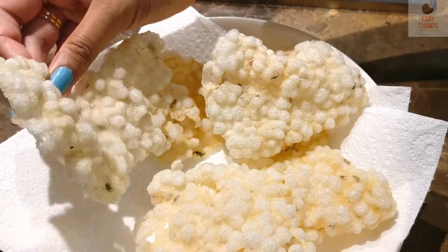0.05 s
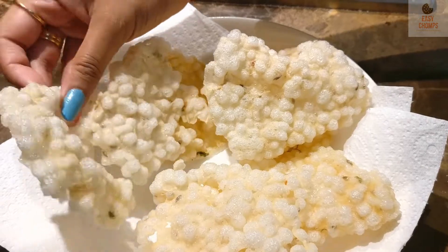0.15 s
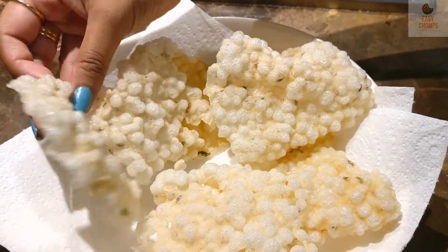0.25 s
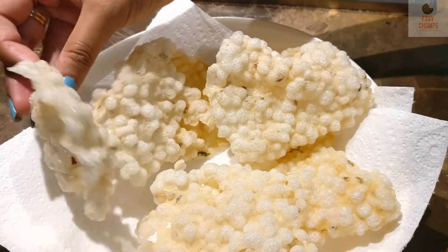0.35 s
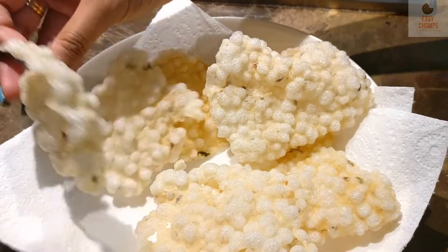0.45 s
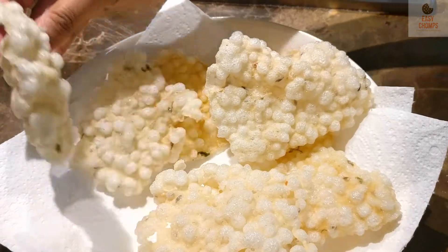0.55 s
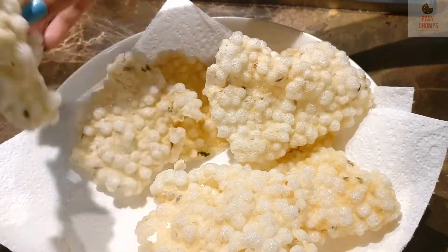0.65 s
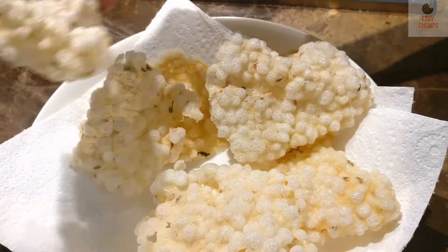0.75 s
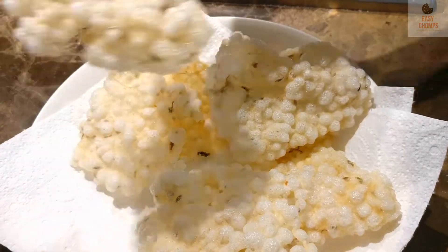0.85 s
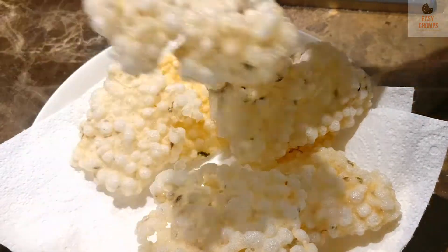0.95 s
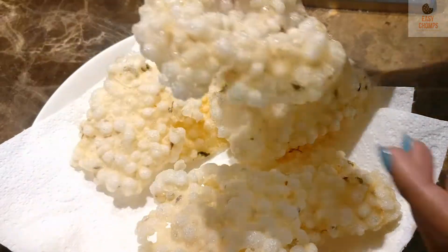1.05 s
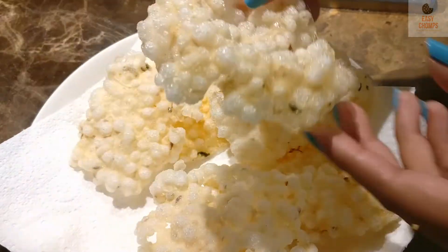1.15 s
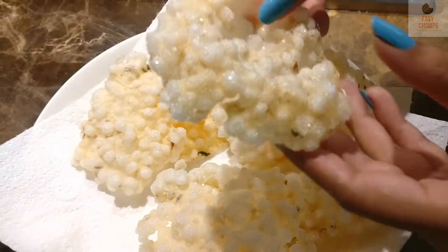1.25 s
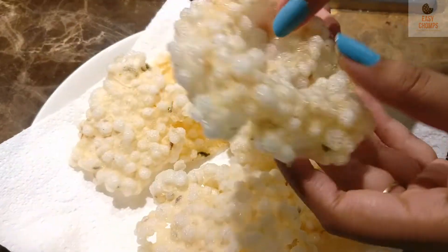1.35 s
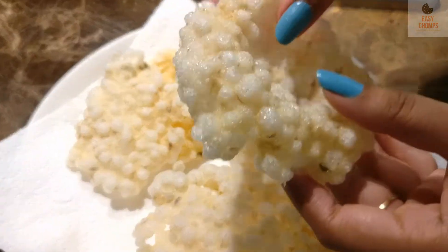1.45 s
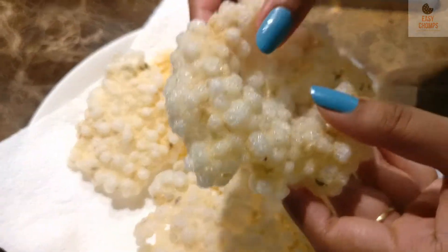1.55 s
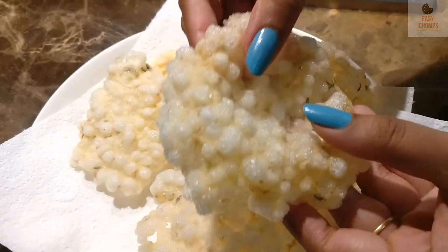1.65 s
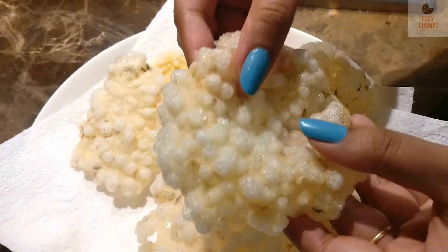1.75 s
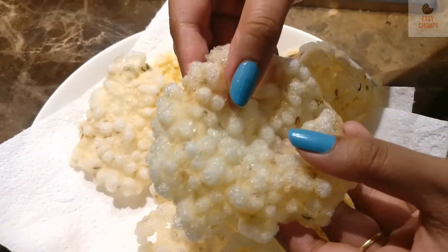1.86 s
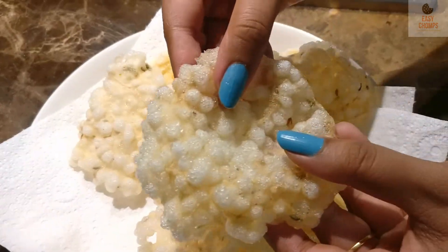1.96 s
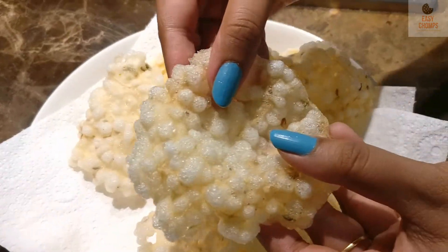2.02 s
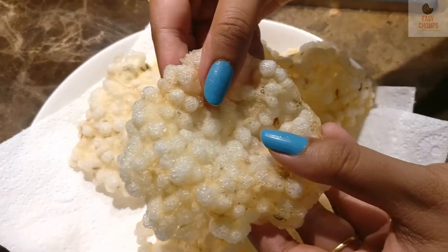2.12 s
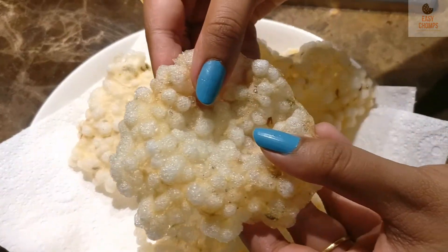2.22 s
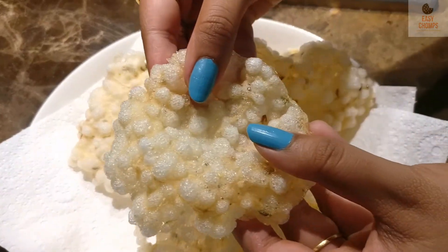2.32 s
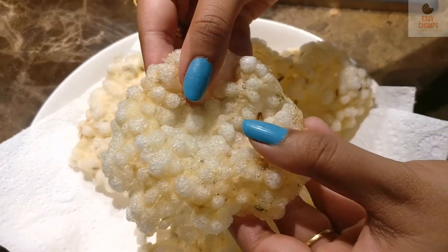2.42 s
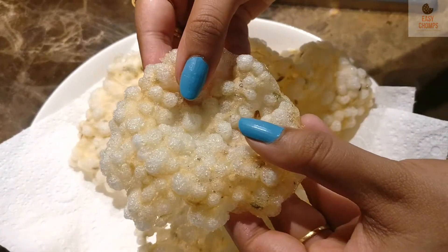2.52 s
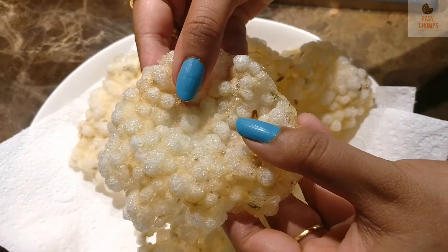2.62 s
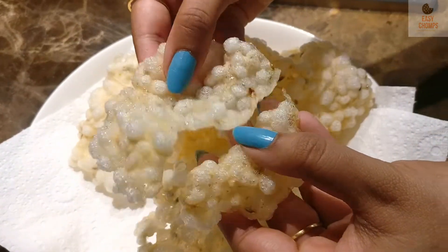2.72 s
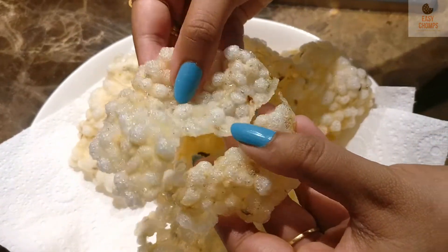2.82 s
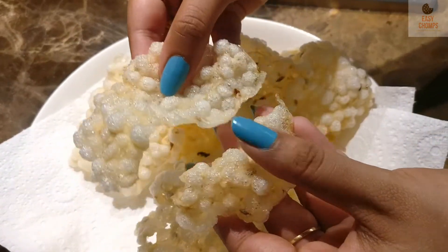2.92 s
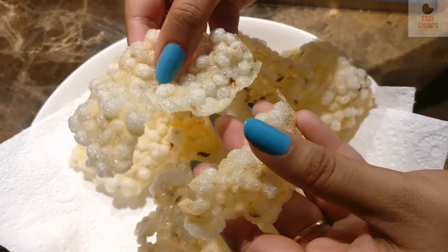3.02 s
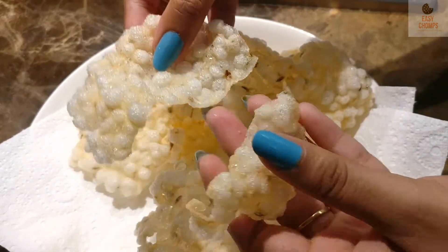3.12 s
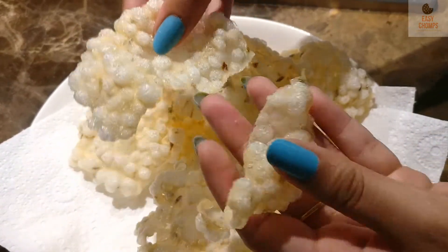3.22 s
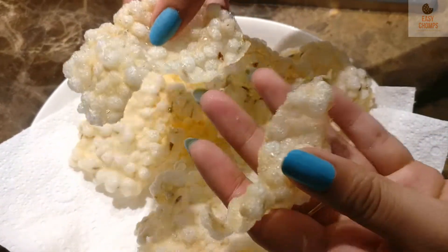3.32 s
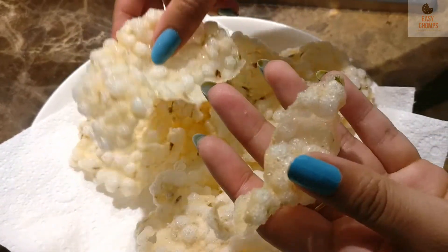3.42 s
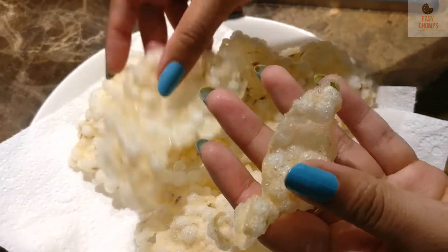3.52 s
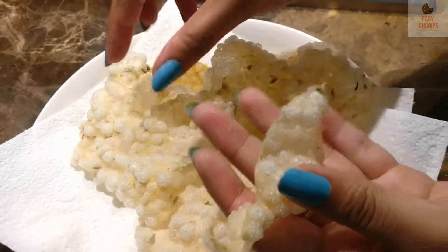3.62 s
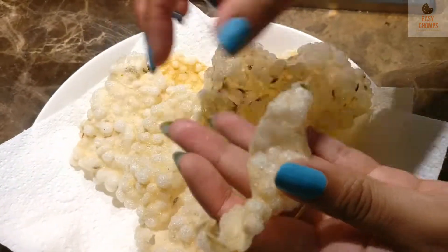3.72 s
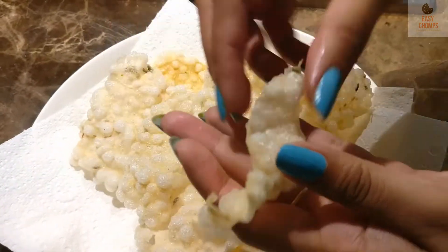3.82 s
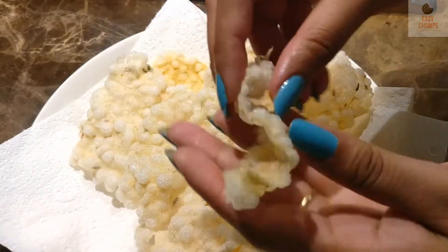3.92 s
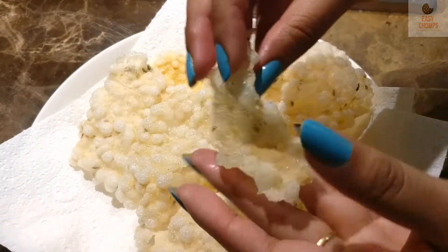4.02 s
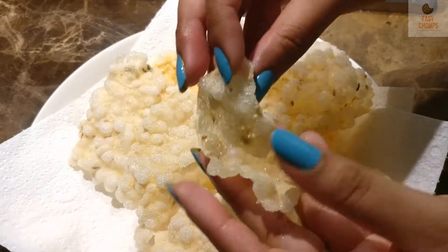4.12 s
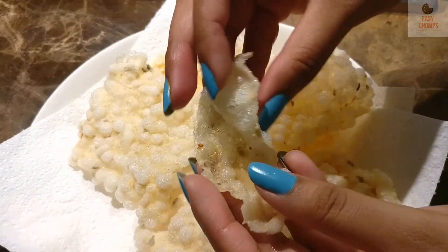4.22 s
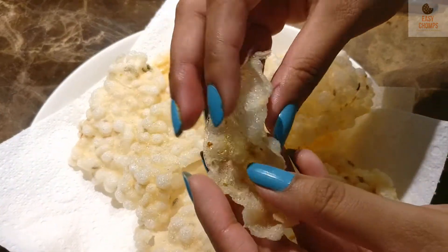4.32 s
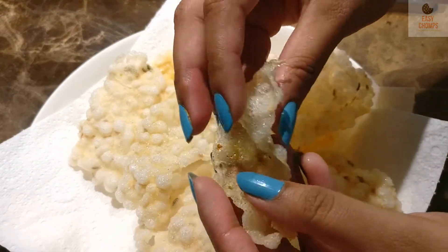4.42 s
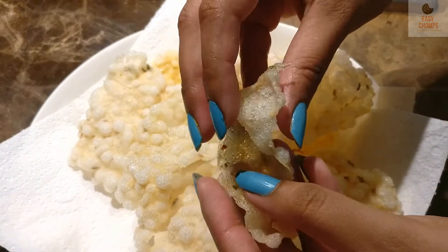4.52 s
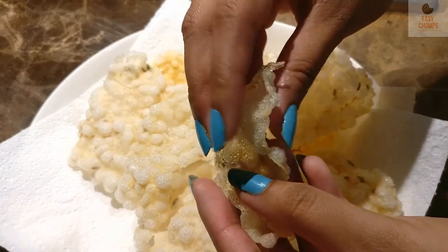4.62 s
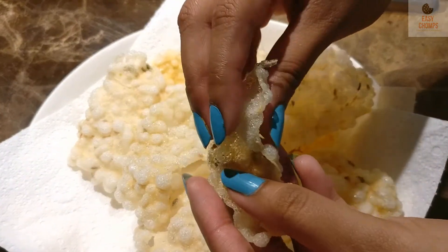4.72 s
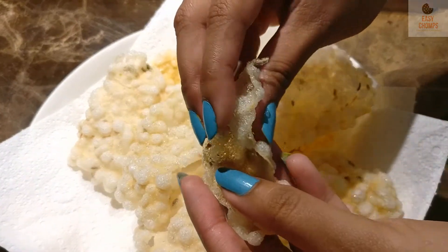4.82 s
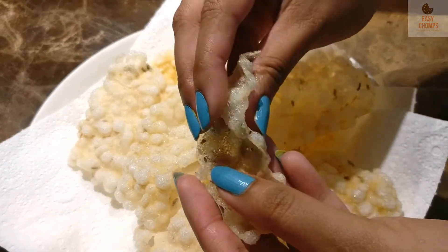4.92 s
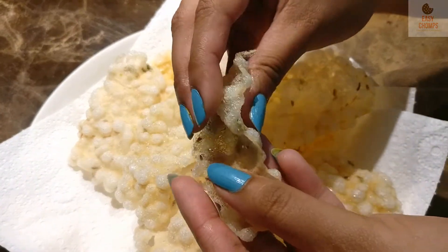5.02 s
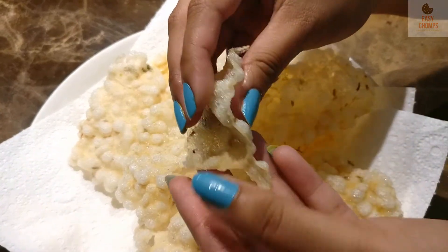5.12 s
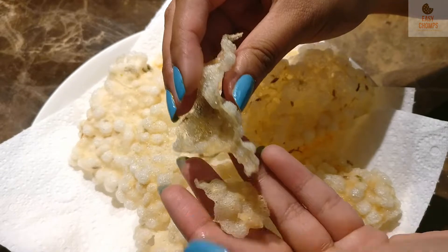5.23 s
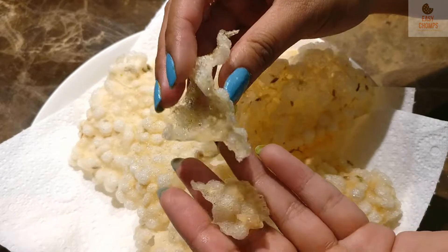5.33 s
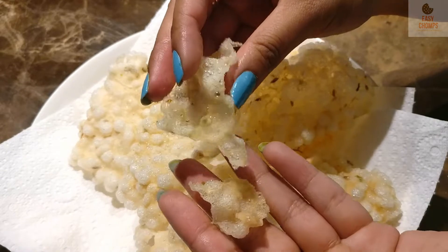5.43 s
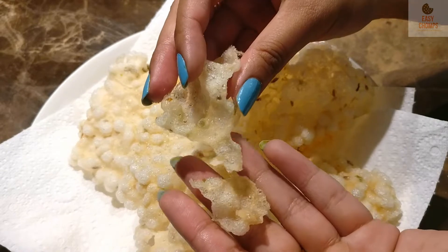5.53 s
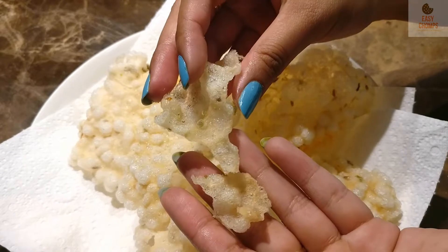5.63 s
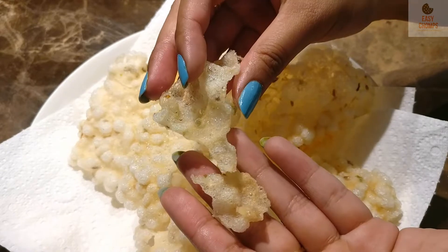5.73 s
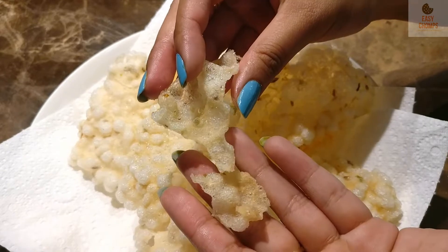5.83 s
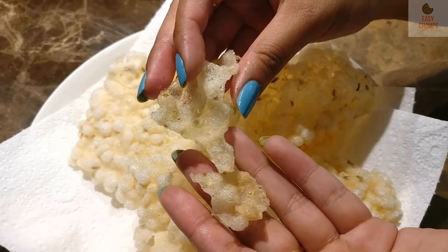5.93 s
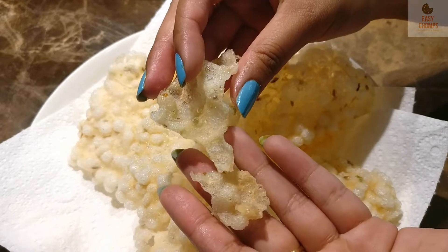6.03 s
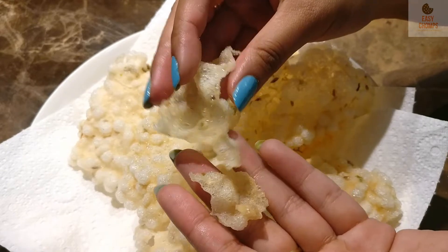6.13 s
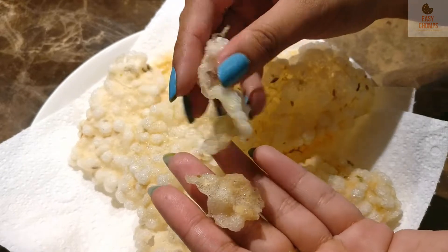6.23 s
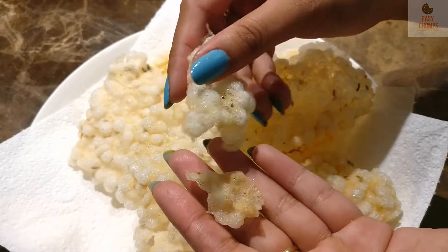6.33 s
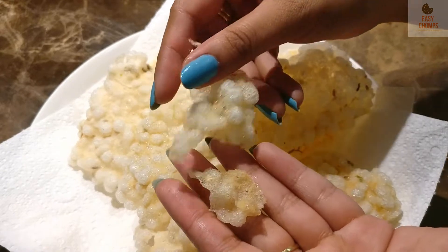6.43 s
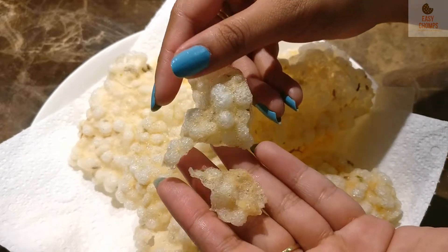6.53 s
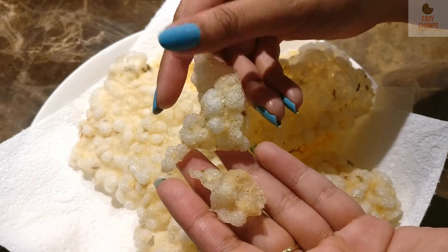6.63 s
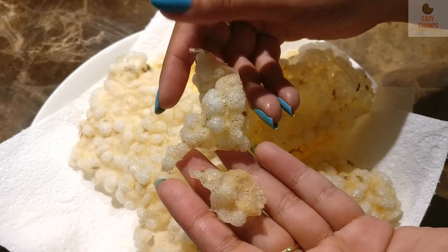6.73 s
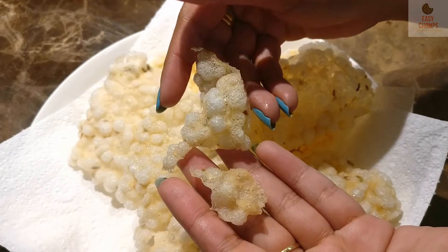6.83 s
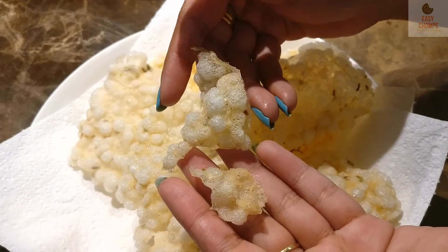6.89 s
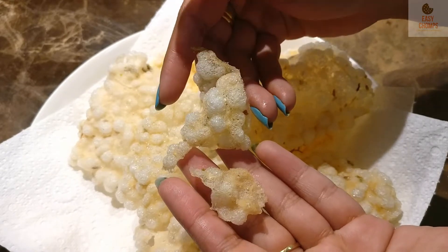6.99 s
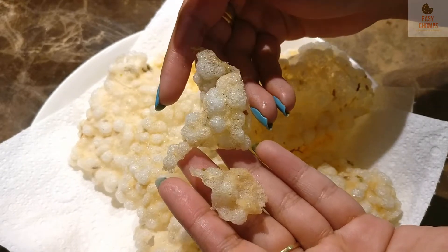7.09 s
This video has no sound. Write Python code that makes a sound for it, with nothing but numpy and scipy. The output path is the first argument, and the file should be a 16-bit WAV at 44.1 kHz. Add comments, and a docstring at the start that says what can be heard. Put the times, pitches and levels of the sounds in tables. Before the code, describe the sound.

Over a quiet low hum and soft air hiss, fingertips shift brittle, bubbly fried pieces on a lined plate. Light rubs and dull taps lead to dry pops, then a sharp splintering break with a short crumbling tail. After some ticks and knocks, a second, tighter snap follows. Handling fades to almost nothing. Close stereo phone pickup, brighter and louder on the right, short room reflections.

```python
"""Over a low hum of appliances, fingers shift on puffed fried wafers on a paper-lined plate; faces rub and pieces bump.
A wafer is lifted, its cells popping one by one as it bends, then it gives way in a quick run of cracks and crumbles.
Half of it clicks and knocks onto the pile; a bright shard then breaks in turn, and the handling grows fainter.
Short noise bursts drive flake resonances, with a dull knock and a treble snap added to each.
Random click showers make the rubbing and crumbling; counter and room answer each sound briefly, close to a phone."""
import sys
import numpy as np
from scipy import signal
from scipy.fft import rfft, irfft, next_fast_len
from scipy.io import wavfile
from scipy.ndimage import uniform_filter1d

SR = 44100
rng = np.random.default_rng(int(sys.argv[2]) if len(sys.argv) > 2 else 0)


def wrap_up_sound(samples):
    """Save the sound to the file named by the first command line argument, as 16-bit audio."""
    columns = np.atleast_2d(samples).T
    # keep every value between -1 and 1, then stretch to whole-number steps
    tamed = np.clip(columns, -1, 1)
    steps = np.round(tamed * 32767).astype(np.int16)
    wavfile.write(sys.argv[1], SR, steps)


N = 315674

# Tone colours of the sheet flexing, the flakes ringing and the fracture itself: pitch_hz [Hz], level_db [dB]
SHEET_KNOCK = [(120, -11), (250, -9.5), (450, -10), (750, -8), (1100, 0), (1550, -4.5), (2000, -2),
               (2500, 0.5), (4000, -62.5)]
FLAKE_RING = [(1300, -14.5), (2000, -5), (2600, 1), (3500, -2), (4300, 0.5), (5700, -1), (6800, -6.5),
              (8500, -29.5), (12000, -46)]
FRACTURE_SNAP = [(4500, -30.5), (7000, -8), (8300, 0), (10000, -2.5), (11500, -5.5), (13500, -2),
                 (15600, 8.5), (17000, -10)]
# Treble colour of cells crushed or rubbed instead of snapped: pitch_hz [Hz], level_db [dB]
CRUSHED_CRUNCH = [(4500, -28), (7000, -3.5), (9000, 4.5), (11500, -5), (13500, 2), (15500, 7.5),
                  (17000, -10)]
# Pieces bent until they give way: bend_start_s [s], fracture_start_s [s], fracture_level_db [dB before the mix]
BENT_PIECES = [(1.952, 2.7238, -31.5), (4.785, 4.901, -45.5)]

FRACTURE_S = 0.032  # time for a fracture to cross the piece
CLEAN_TEAR_S, CRUSHED_TEAR_S = 0.0008, 0.00049  # shortest decay of the push: bent wall, pinched wall


def undb(db):
    """Decibels to gain."""
    return 10 ** (np.asarray(db) / 20)


def unit(x):
    """Scale to rms 1."""
    return x / np.sqrt(np.mean(x ** 2) + 1e-30)


def outline_gain(points, size):
    """Gain at each FFT bin, drawn through (Hz, dB) points on a logarithmic pitch axis."""
    hz, db = np.transpose(points)
    bins_hz = np.fft.rfftfreq(size, 1 / SR)
    return undb(np.interp(np.log(bins_hz + 1), np.log(hz), db))


def response(points, size=1024):
    """Minimum-phase impulse response of a (Hz, dB) outline, so that no sound precedes its cause."""
    cepstrum = irfft(np.log(outline_gain(points, size)))
    # folding the cepstrum onto positive time makes the filter causal
    cepstrum[1:size // 2] *= 2
    cepstrum[size // 2 + 1:] = 0
    return irfft(np.exp(rfft(cepstrum)))


def colour(x, points):
    """Filter with a (Hz, dB) outline."""
    return signal.fftconvolve(x, response(points))[:len(x)]


def noise(points):
    """Steady noise of a given colour, rms 1."""
    size = next_fast_len(N)
    spectrum = rfft(rng.standard_normal(size)) * outline_gain(points, size)
    return unit(irfft(spectrum, size)[:N])


def walk(rate_hz):
    """Smooth random wander, rms 1: held random steps averaged twice."""
    step = int(SR / rate_hz)
    held = np.repeat(rng.standard_normal(N // step + 1), step)
    return unit(uniform_filter1d(uniform_filter1d(held, step), step)[:N])


def resonate(x, hz, width_hz):
    """One damped mode, gain 1 at its centre."""
    return signal.lfilter(*signal.iirpeak(hz, hz / width_hz, fs=SR), x)


def add(track, s, sound):
    """Mix a sound in at time s."""
    start = max(int(s * SR), 0)
    track[start:start + len(sound)] += sound[:max(N - start, 0)]


def appliances(rumble_db=-47.5, side_db=-68, hiss_db=-66, waver_rad=0.71, throb_db=2):
    """Motor tones wander in phase and level over a rumble and a soft hiss of air."""
    # Motor tones: pitch_hz [Hz], level_db [dB, before the throb]
    motor_tones = [(48.5, -57), (101.5, -58)]
    # Colours of the kitchen air, alike in both ears, opposed between them, and its hiss: pitch_hz [Hz], level_db [dB]
    air_mid = [(20, -36), (33, -29), (41, -8), (56, -2.5), (68, 1.5), (85, -2), (105, 0), (145, -10.5),
               (170, -19), (200, -15.5), (230, -28), (290, -18), (340, -26.5), (470, -27.5)]
    air_side = [(20, -14.5), (45, 6.5), (150, 3), (250, -5.5), (400, -6.5), (600, -31)]
    air_hiss = [(150, -23.5), (400, -21.5), (600, 2), (1200, 0), (2000, -1), (2400, -5), (3500, -10),
                (4400, -9), (6000, -18.5), (7800, -24.5), (10500, -20.5), (13000, -17.5), (16000, -20.5)]
    t = np.arange(N) / SR
    hum = np.zeros(N)
    for hz, db in motor_tones:
        level = np.sqrt(2) * undb(db + throb_db * walk(2.5))
        hum += level * np.sin(2 * np.pi * hz * t + waver_rad * walk(5.1))
    low_pass = signal.butter(2, 480, fs=SR, output="sos")
    rumble = undb(rumble_db) * signal.sosfilt(low_pass, noise(air_mid))
    side = undb(side_db) * noise(air_side) * np.array([[1], [-1]])
    hiss = np.array([noise(air_hiss), noise(air_hiss)]) * undb(hiss_db + 0.13 * walk(7.4))
    return hum + rumble + side + hiss


def handling(level_db=-75, snap_db=-9, grain_rate=700, rest_s=5.8, rest_db=-8):
    """Fingertips shift on the rough crust in sparse grains, less once the pieces lie in the palm."""
    luck, size = rng.random((2, N))
    grains = (luck < grain_rate / SR) * undb(-3 * np.log(np.maximum(size, .02)))
    busy_db = np.interp(np.arange(N) / SR, [rest_s - .5, rest_s], [0, rest_db])
    ring = unit(colour(grains, FLAKE_RING))
    snap = undb(snap_db) * unit(colour(grains, FRACTURE_SNAP))
    return undb(level_db + busy_db) * (ring + snap)


def piece(s):
    """Lowest mode, bumped pitch, knock and snap of the piece handled at time s."""
    # Wafer on the plate, wafer lifted, half laid down, shard (knocks least, brightest): handled_from_s [s],
    # lowest_mode_hz [Hz], bumped_pitch_hz [Hz], knock_db and snap_db [dB over the ring, before each touch's offset]
    piece_rows = [(0, 2770, 3600, -7, -6.5), (1.1, 3040, 3110, -5.5, -5.5), (3.3, 2920, 4700, -3.5, -5),
                  (3.8, 3550, 4660, -10.5, 2.5)]
    return piece_rows[sum(s >= row[0] for row in piece_rows[1:])][1:]


def flake(push, hz, second_hz, mode_width_hz, mode_db=9, second_width_hz=480, second_db=6, edge=0.83):
    """A wafer rings with two modes of the struck flake, and little below the lower one."""
    high_pass = signal.butter(4, edge * min(hz, second_hz), "high", fs=SR, output="sos")
    body = signal.sosfilt(high_pass, colour(push, FLAKE_RING))
    main = undb(mode_db) * resonate(body, hz, mode_width_hz)
    second = undb(second_db) * resonate(body, second_hz, second_width_hz)
    return unit(body + main + second)


def shower(grain_rate=3000, scatter_db=3, catch_db=3):
    """Blisters catch and crumble in spurts of tiny clicks, random in time, size and sign."""
    luck, size, sign = rng.random((3, N))
    sizes = undb(-scatter_db * np.log(np.maximum(size, .02)) + catch_db * walk(220))
    return (luck < grain_rate / SR) * sizes * np.sign(sign - .5)


def crumble(clicks, start, end, hz, low_db, high_db, treble, edge=0.13, mode_width_hz=1500,
            ring_db=-2, second_db=3):
    """A stretch of clicks falls on many flakes, so the main resonance is broad."""
    first = int(start * SR)
    grains = clicks[first:max(int(end * SR), first + 256)]
    grains = grains * signal.windows.tukey(len(grains), edge)
    lowest_hz, _, _, _ = piece(start)
    ring = undb(ring_db) * flake(grains, hz, lowest_hz, mode_width_hz, second_db=second_db)
    knock = undb(low_db) * unit(colour(grains, SHEET_KNOCK))
    snap = undb(high_db) * unit(colour(grains, treble))
    return ring + knock + snap


def rubs(snap_db=-6, sharpness=2.7):
    """Rough faces catch and slip over each other, each stroke on other flakes."""
    # Rubbing strokes: start_s [s], end_s [s], level_db [dB before the mix], pitch_hz [Hz], knock_db [dB]
    rub_rows = [(0.037, 0.103, -62, 3780, -5.5), (0.132, 0.328, -62.5, 3100, -4.5),
                (0.173, 0.216, -61.5, 4400, -11), (0.451, 0.506, -63.5, 1680, -1),
                (1.319, 1.336, -58, 2860, -8), (1.37, 1.466, -61.5, 3000, -6), (1.616, 1.67, -61, 2880, 0),
                (1.687, 1.786, -62, 2800, -3.5), (2.835, 2.889, -54.5, 3900, -10),
                (3.213, 3.245, -58.5, 2930, -3), (3.243, 3.269, -56, 5370, -9),
                (3.398, 3.458, -59, 5300, -9), (3.626, 3.675, -52.5, 2530, -6),
                (3.926, 4.003, -62.5, 4700, -9), (4.061, 4.1, -67.5, 4600, -5),
                (4.145, 4.162, -64, 4600, -1), (4.357, 4.404, -56.5, 4860, -8),
                (4.439, 4.47, -51, 4040, -5.5), (4.708, 4.77, -70, 4400, -20),
                (6.198, 6.26, -73, 4480, -12), (6.378, 6.44, -69, 4600, -17)]
    out = np.zeros(N)
    clicks = shower(grain_rate=1200, scatter_db=3.5, catch_db=1.5)
    for start, end, db, hz, low_db in rub_rows:
        _, _, _, high_db = piece(start)
        stroke = crumble(clicks, start, end, hz, low_db, high_db + snap_db, CRUSHED_CRUNCH,
                         mode_width_hz=hz / sharpness)
        add(out, start, undb(db) * stroke)
    return out


def even(push, evenness=0.8):
    """Keep a push ragged in time but level its spectrum, so that the wafer gives most of the colour."""
    length = push.shape[-1]
    spectrum = rfft(push, 2 * length)
    return irfft(spectrum / (np.abs(spectrum) + 1e-9) ** evenness)[..., :length]


def burst(db, hz, second_hz, low_db, high_db, tear_s, treble, mode_width_hz,
          snap_stretch=2.0, crush_s=0.00073, first_pulse=1.1):
    """A sharp pulse and a short ragged tear ring the flake; the sheet gives more slowly."""
    t = np.arange(1024) / SR
    spread = np.sqrt(.003 / t[-1])  # refers the level to about the first 3 ms
    decays_s = np.array([[tear_s], [snap_stretch * tear_s], [tear_s + crush_s]])
    fades = np.exp(-t / decays_s)
    pushes = rng.standard_normal(fades.shape) * fades + first_pulse * (t == 0)
    tear, fracture, crush = even(pushes)
    ring = flake(tear, hz, second_hz, mode_width_hz)
    knock = undb(low_db) * unit(colour(crush, SHEET_KNOCK))
    snap = undb(high_db) * unit(colour(fracture, treble))
    return spread * undb(db) * (ring + knock + snap)


def taps(snap_db=-5, mode_width_hz=1800, bump_s=0.0061):
    """A piece bumping the others shakes its whole sheet with a slow push and rings broadly."""
    # Bumps: time_s [s], level_db [dB before the mix]
    tap_rows = [(0.181, -47), (0.459, -51), (0.977, -53.5), (1.237, -56.5), (1.441, -51.5), (1.653, -45),
                (1.748, -54), (2.769, -46), (2.856, -46)]
    out = np.zeros(N)
    for s, db in tap_rows:
        lowest_hz, hz, low_db, high_db = piece(s)
        add(out, s, burst(db, hz, lowest_hz, low_db, high_db + snap_db, bump_s, CRUSHED_CRUNCH, mode_width_hz))
    return out


def cracks(bent_knock_db=-11, pinch_knock_db=-5, mode_width_hz=640, small_crack_db=-49, tear_doubles_db=22):
    """Walls snap cleanly while a piece is bent, and are crushed with more body when only pinched."""
    # Cell walls giving way: time_s [s], ring_level_db [dB over about 3 ms, before the mix], main_mode_hz [Hz],
    # second_mode_hz [Hz], snap_db [dB over the ring]
    crack_rows = [(0.5734, -64, 5100, 3600, 7), (0.917, -52, 6150, 3520, -1),
                  (1.984, -42.5, 3100, 5600, -4.5), (2.014, -61, 4500, 3300, -3),
                  (2.063, -63, 5600, 3200, -4), (2.168, -39, 5800, 3100, 3), (2.1863, -40, 2720, 4300, -12),
                  (2.2496, -47.5, 5670, 2250, -2.5), (2.267, -49.5, 4000, 5830, -10),
                  (2.295, -46.5, 4000, 4160, -8), (2.382, -55, 5460, 3100, -3),
                  (2.3927, -42, 5960, 2090, 2), (2.4012, -37, 4360, 2940, -7.5),
                  (2.517, -51.5, 4300, 2980, -2), (2.543, -49.5, 5400, 3060, -2),
                  (2.561, -51.5, 5800, 4130, 1.5), (2.6004, -50.5, 4300, 2900, 3),
                  (2.638, -48.5, 4250, 2870, -1.5), (2.6763, -59, 5900, 4200, 2),
                  (2.696, -65, 5900, 4400, 4), (2.7262, -37.5, 2500, 4700, -9),
                  (2.7304, -33, 4750, 5400, -10), (2.7318, -34, 3300, 4400, -9.5),
                  (2.7366, -18, 4430, 3250, -7), (2.7403, -20.5, 5640, 5150, -7),
                  (2.7508, -28, 4940, 3250, -5.5), (2.754, -29, 2950, 4440, -6),
                  (2.7735, -44, 4800, 3010, -1), (3.8733, -74, 4960, 3850, 7),
                  (3.9444, -49, 4400, 6000, -14), (3.9732, -54, 6140, 4400, -6),
                  (3.9833, -57, 5040, 3540, -9), (4.12, -68, 5200, 3770, 4), (4.141, -56, 4700, 3450, 3),
                  (4.3606, -47.5, 4900, 3170, -0.5), (4.372, -49, 3300, 5000, -5),
                  (4.3742, -44, 5160, 3180, -14), (4.394, -46, 4550, 5600, -19),
                  (4.4478, -40, 3620, 4630, -10), (4.454, -47, 5650, 3870, -18),
                  (4.465, -42.5, 3900, 4560, -15), (4.4683, -38.5, 4300, 3230, -10),
                  (4.716, -60, 4400, 5200, -1), (4.8623, -44.5, 3400, 5900, 2.5),
                  (4.885, -53, 7000, 4400, -1), (4.906, -44, 4260, 7400, 6.5),
                  (4.9225, -35, 3685, 5800, -1), (4.9282, -20.5, 4300, 3930, -7.5),
                  (4.935, -35.5, 4300, 5900, -5), (4.944, -42, 4250, 3500, -18),
                  (4.952, -49, 4400, 3400, -2), (5.2268, -55, 4940, 3620, -2),
                  (5.3554, -63.5, 5410, 4050, 8.5), (5.904, -63.5, 5850, 4220, 2),
                  (6.2004, -66, 4200, 5650, 3.5)]
    out = np.zeros(N)
    for s, db, hz, second_hz, high_db in crack_rows:
        _, _, low_db, _ = piece(s)
        # jolt: first pulse against the tear that follows
        if any(start < s < gives + FRACTURE_S for start, gives, _ in BENT_PIECES):
            tear_s, jolt, body_db, treble = CLEAN_TEAR_S, 5.0, bent_knock_db, FRACTURE_SNAP
        else:
            tear_s, jolt, body_db, treble = CRUSHED_TEAR_S, 2.2, pinch_knock_db, CRUSHED_CRUNCH
        # louder cracks tear for longer
        tear_s = tear_s * 2 ** (max(db - small_crack_db, 0) / tear_doubles_db)
        add(out, s, burst(db, hz, second_hz, low_db + body_db, high_db, tear_s, treble, mode_width_hz,
                          first_pulse=jolt))
    return out


def held_wafer(contact, direct_db, ring_db, from_s=0.99, to_s=3.5):
    """While held clear of the pile, the sheet rings on its free modes after every touch."""
    # Free modes of a whole wafer held by its edge: pitch_hz [Hz], width_hz [Hz], level_db [dB before ring_db]
    sheet_modes = [(2830, 110, 4), (3160, 170, 1), (4400, 250, -9.5)]
    t = np.arange(N) / SR
    held = contact * ((t > from_s) & (t < to_s))
    ring = sum(undb(db) * resonate(held, hz, width_hz) for hz, width_hz, db in sheet_modes)
    return contact - held + undb(direct_db) * held + undb(ring_db) * ring


def bending(low_hz=3000, high_hz=6000, knock_db=-13, snap_db=3, mode_width_hz=560,
            pops_per_s=11, pop_db=-67, scatter_db=3.5):
    """Tiny cells pop faintly at random under the strain, more often towards the break."""
    out = np.zeros(N)
    for start, gives, _ in BENT_PIECES:
        pop_count = int(pops_per_s * (gives - start)) + 1
        for when, flake_size, luck in rng.random((pop_count, 3)):
            s = start + np.sqrt(when) * (gives - start)  # the root crowds pops towards the break
            db = pop_db + scatter_db * (2 * luck - 1)
            hz = low_hz + flake_size * (high_hz - low_hz)
            lowest_hz, _, _, _ = piece(s)
            add(out, s, burst(db, hz, lowest_hz, knock_db, snap_db, CLEAN_TEAR_S, FRACTURE_SNAP, mode_width_hz))
    return out


def fractures(flake_hz=4500, knock_db=-5.0, snap_db=-7, edge_knock_db=-1, edge_snap_db=-8,
              crumble_s=0.099, crumble_db=-15.5, settle_s=0.07):
    """A dense run of failing cells crosses the piece, then the broken edges grind apart and fall quiet."""
    out = np.zeros(N)
    clicks = shower(grain_rate=3600, scatter_db=4.0, catch_db=5.5)
    crumbs = shower(grain_rate=810, scatter_db=2.5, catch_db=5.5)
    for _, start, db in BENT_PIECES:
        _, _, low_db, high_db = piece(start)
        end = start + FRACTURE_S
        run = crumble(clicks, start, end, flake_hz, low_db + knock_db, snap_db, FRACTURE_SNAP,
                      edge=0.12, mode_width_hz=2900, second_db=4)
        add(out, start, undb(db) * run)
        grind = crumble(crumbs, end, end + crumble_s, flake_hz, low_db + edge_knock_db,
                        high_db + edge_snap_db, CRUSHED_CRUNCH, mode_width_hz=2400, second_db=4)
        settle = np.exp(-np.arange(len(grind)) / SR / settle_s)
        add(out, end, undb(db + crumble_db) * grind * settle)
    return out


def landing(flake_hz=4900, second_hz=2850, knock_db=-8, snap_db=-8, mode_width_hz=900, push_s=0.0015):
    """The dropped half clicks on its edge, each click with a hollow knock from the modes of the pile."""
    # Contacts of the half with the pile: time_s [s], click_level_db and knock_level_db [dB before the mix]
    landing_rows = [(3.6252, -46.5, -67), (3.6397, -42.5, -56.5), (3.648, -45, -53), (3.6535, -42, -57)]
    # Modes of the pile on its plate: pitch_hz [Hz], width_hz [Hz, of each of two passes], level_db [dB, relative]
    pile_modes = [(315, 240, -5.5), (524, 68, -3.5), (1150, 300, -6), (1516, 420, 0.5), (2030, 160, 1),
                  (2700, 1400, -0.5)]
    out = np.zeros(N)
    t = np.arange(2048) / SR
    for s, click_db, thud_db in landing_rows:
        add(out, s, burst(click_db, flake_hz, second_hz, knock_db, snap_db, CRUSHED_TEAR_S,
                          CRUSHED_CRUNCH, mode_width_hz))
        push = even(rng.standard_normal(len(t)) * np.exp(-t / push_s))
        thud = np.zeros(len(t))
        for hz, width_hz, db in pile_modes:
            mode = resonate(resonate(push, hz, width_hz), hz, width_hz)
            thud += undb(db) * unit(mode)
        add(out, s, undb(thud_db) * unit(thud))
    return out


def kitchen(x, near_t60_s=0.0867, near_db=-7, far_t60_s=0.38, far_db=-18, gap_s=0.0012, echoes_per_s=3500):
    """Separate quick reflections from plate, hands and counter join the fainter, longer ring of the room."""
    # Colours of the near reflections and of the room's late ring: pitch_hz [Hz], level_db [dB]
    near_colour = [(200, -2), (1200, -3), (4200, 0), (7000, -1.5), (10000, -4), (16000, -3.5)]
    far_colour = [(200, -4.5), (1500, 4.5), (4500, -1), (7000, 2), (10000, -4), (16000, -5.5)]
    t = np.arange(SR // 2) / SR
    near_fade = np.exp(-np.log(1000) * t / near_t60_s) * (t > gap_s)
    far_fade = np.exp(-np.log(1000) * t / far_t60_s) * (t > 2 * gap_s)
    out = []
    for _ in range(2):  # left, right
        near, far = rng.standard_normal((2, len(t)))
        echoes = near * (rng.random(len(t)) < echoes_per_s / SR)
        near = undb(near_db) * unit(colour(echoes * near_fade, near_colour))
        far = undb(far_db) * unit(colour(far * far_fade, far_colour))
        out.append(signal.fftconvolve(x, (near + far) / np.sqrt(len(t)))[:N])
    return np.array(out)


def scene(wafer_db=2, left_room_db=4.0, port_lag_s=.00016):
    """The wafers reach the left port first and the right one louder, with the appliances beneath."""
    # The left port is shaded from the hands: pitch_hz [Hz], level_db [dB]
    left_shade = [(500, -7.5), (1300, -4), (2900, -5.5), (4400, -15), (7000, -13), (9000, -10), (12000, 2),
                  (15500, -7.5)]
    snaps = held_wafer(cracks() + bending(), direct_db=-0.5, ring_db=-16.5)
    touches = held_wafer(taps() + rubs() + handling(), direct_db=-2.5, ring_db=-9.5)
    wafers = snaps + touches + fractures() + landing()
    late = np.roll(wafers, int(round(port_lag_s * SR)))
    left_reply, right_reply = kitchen(wafers)
    left = colour(wafers + undb(left_room_db) * left_reply, left_shade)
    right = late + right_reply
    return undb(wafer_db) * np.array([left, right]) + appliances()


def record(dry):
    """The phone cuts the treble steeply above 16 kHz."""
    return signal.sosfilt(signal.ellip(10, .2, 70, 16000, fs=SR, output="sos"), dry)


dry = scene()
out = record(dry)
wrap_up_sound(out)
```